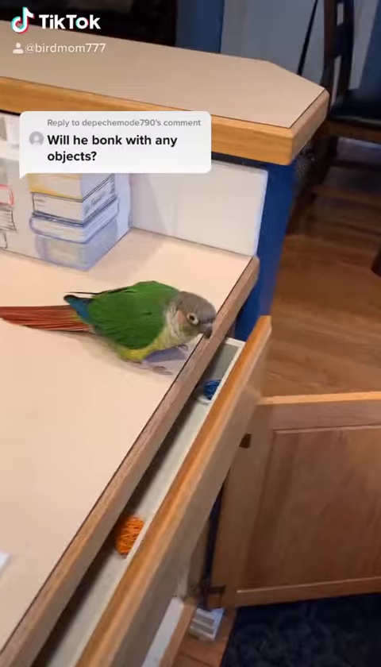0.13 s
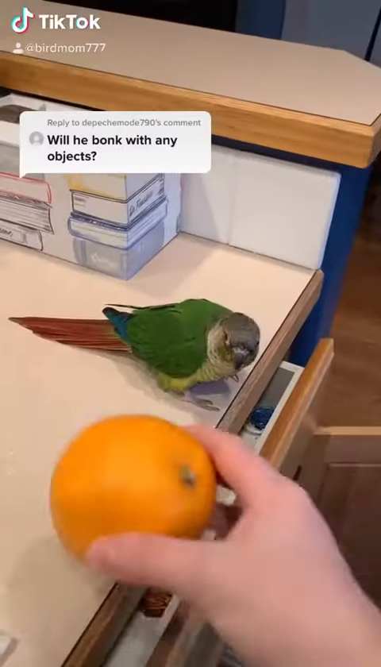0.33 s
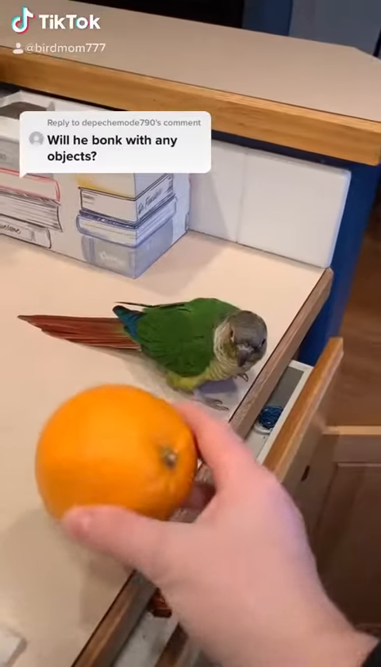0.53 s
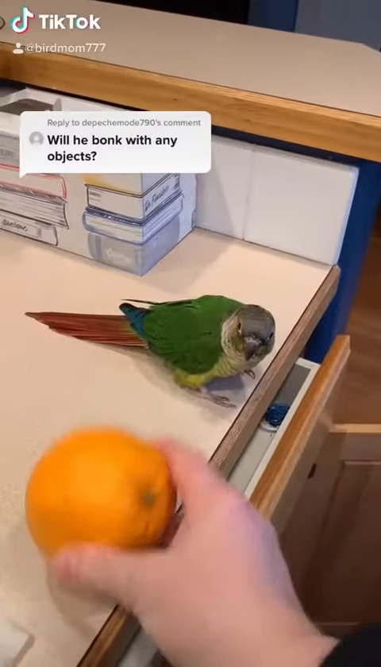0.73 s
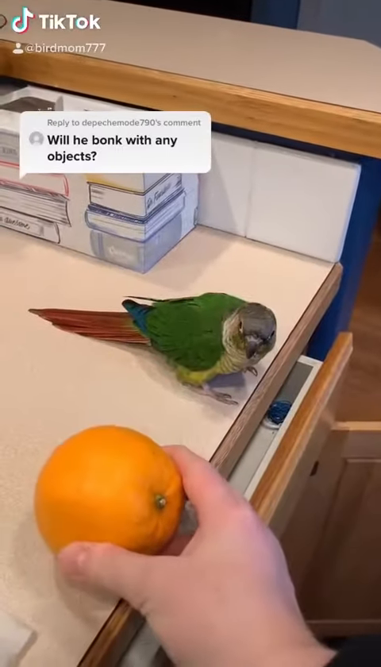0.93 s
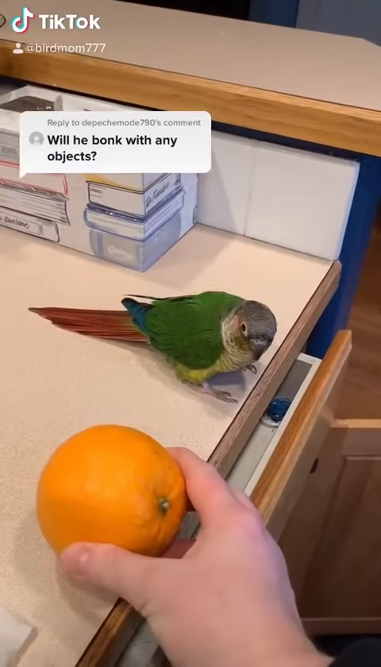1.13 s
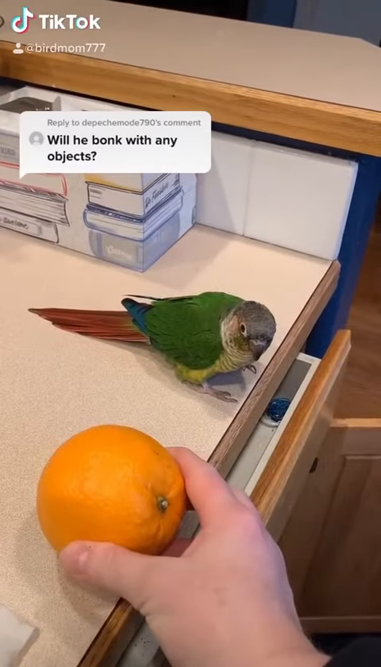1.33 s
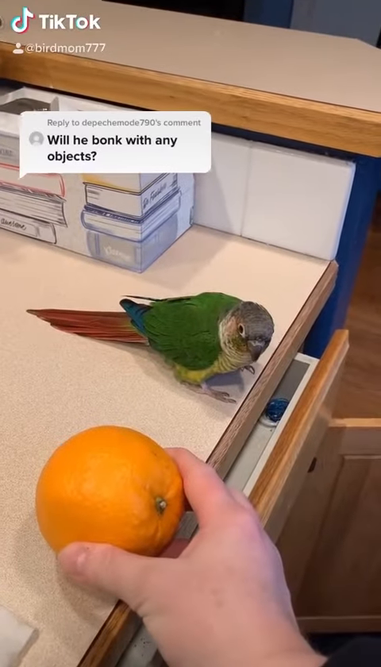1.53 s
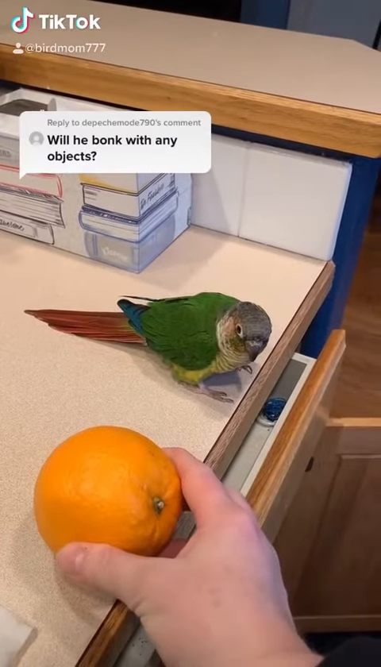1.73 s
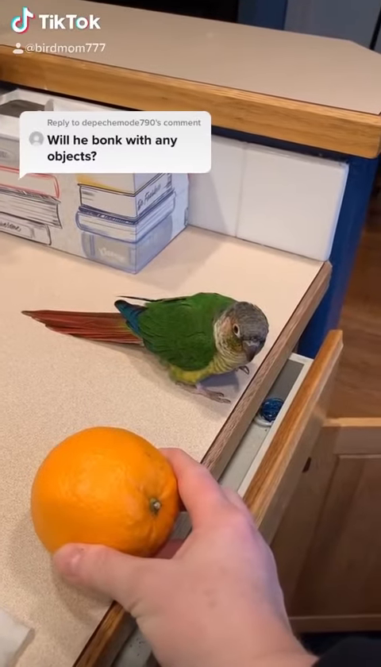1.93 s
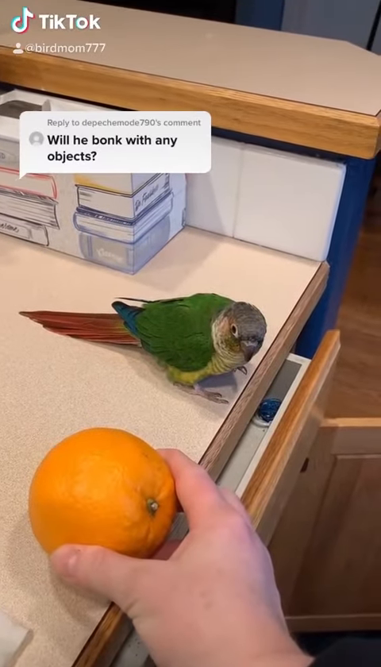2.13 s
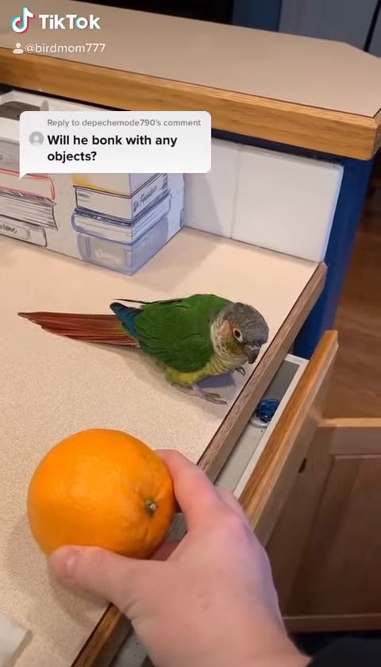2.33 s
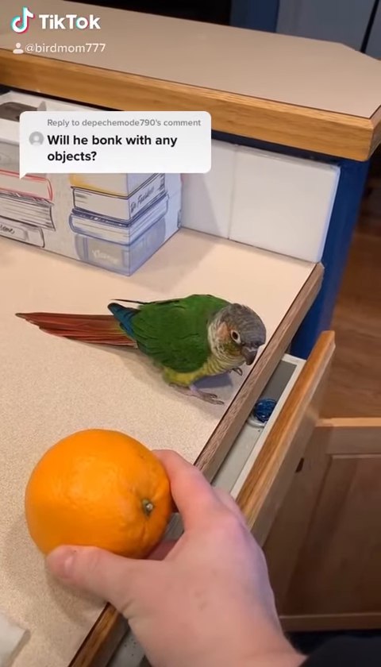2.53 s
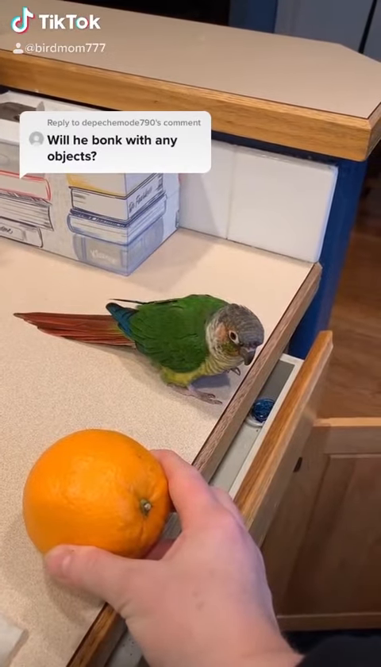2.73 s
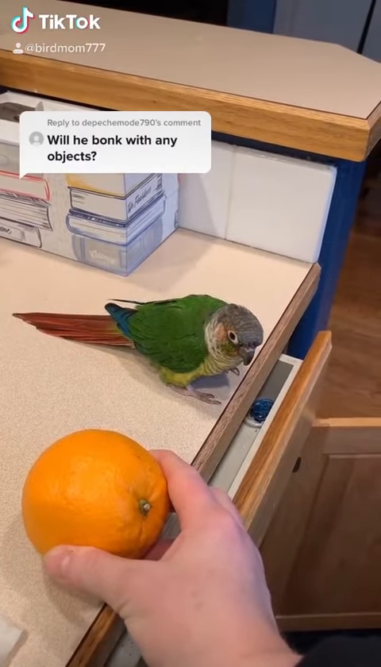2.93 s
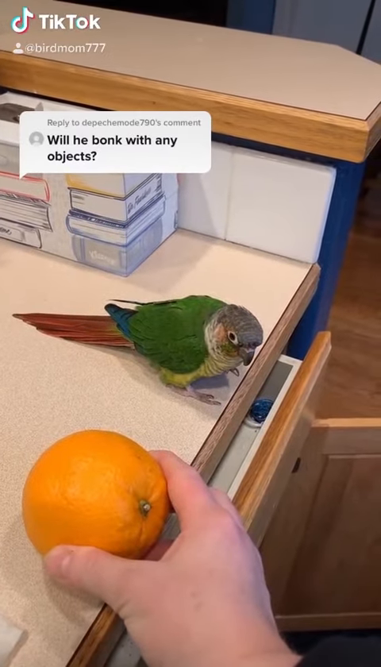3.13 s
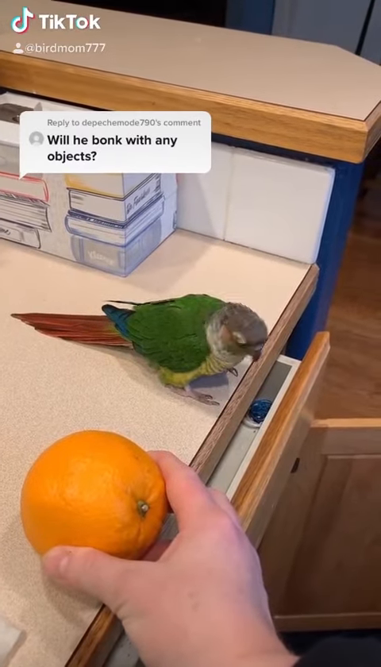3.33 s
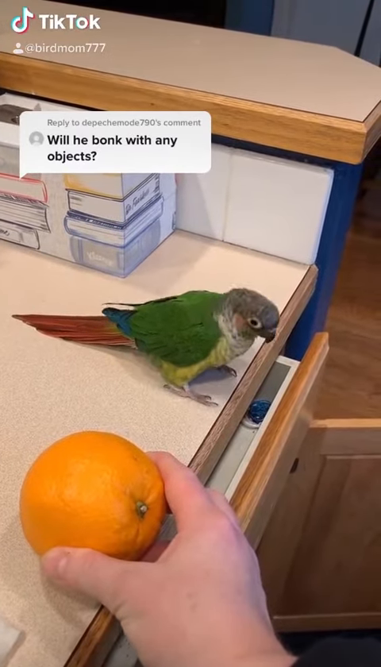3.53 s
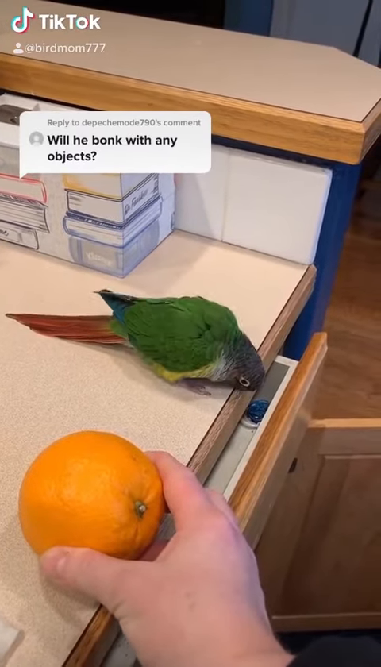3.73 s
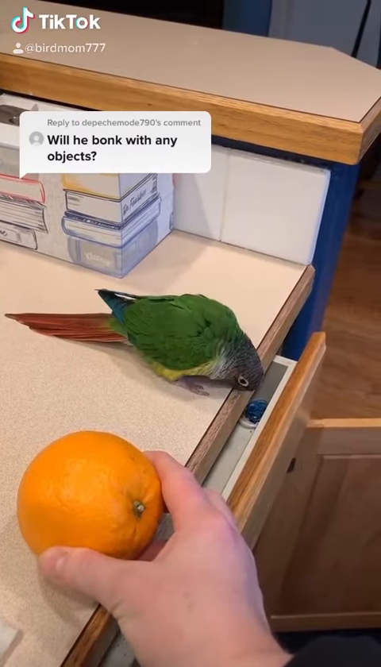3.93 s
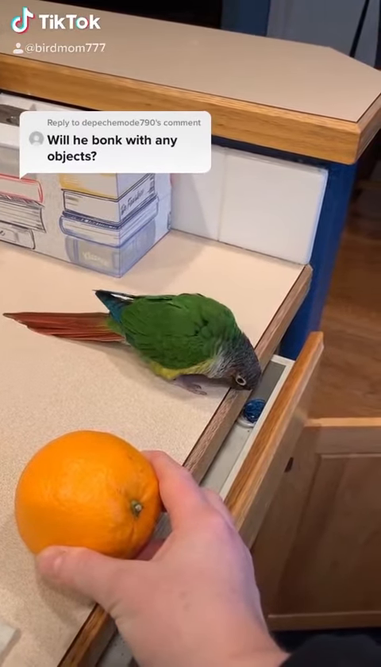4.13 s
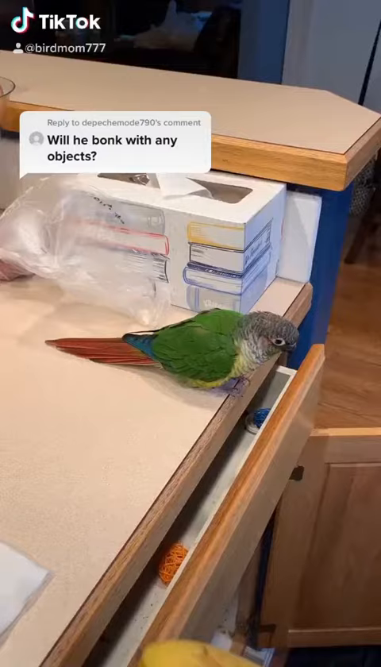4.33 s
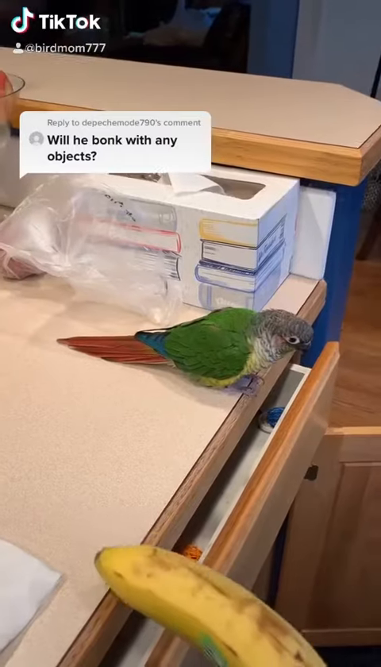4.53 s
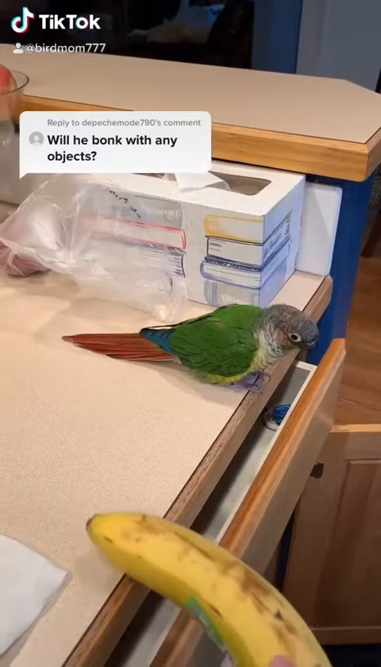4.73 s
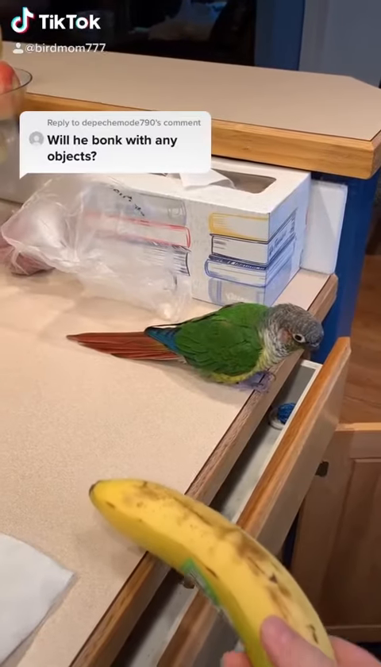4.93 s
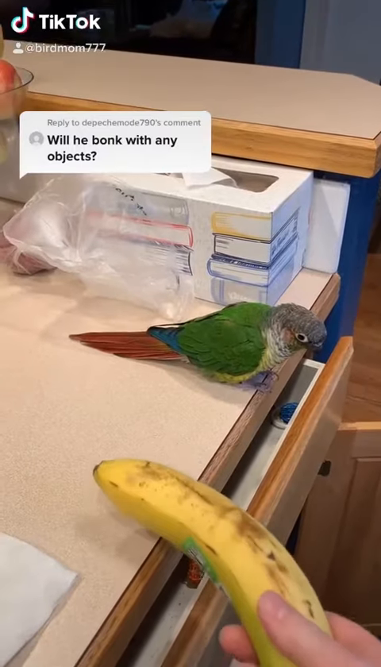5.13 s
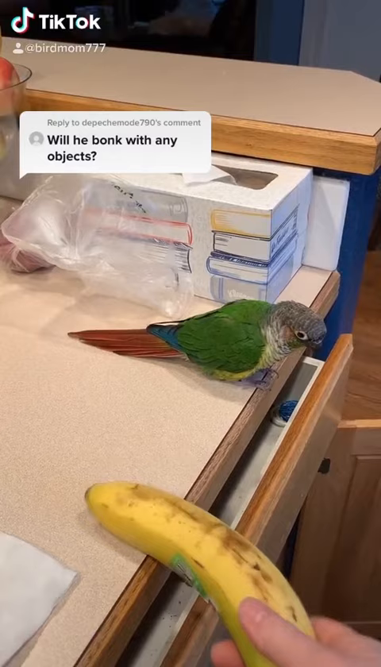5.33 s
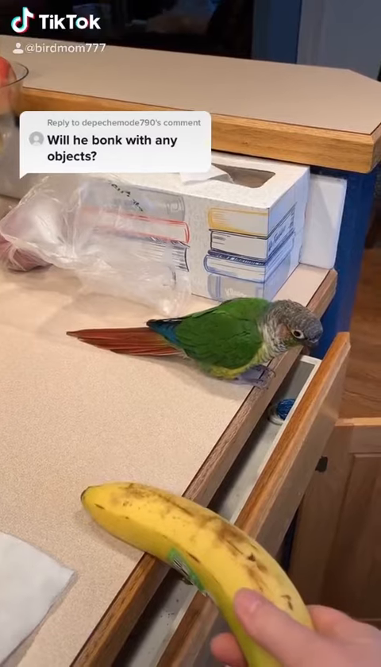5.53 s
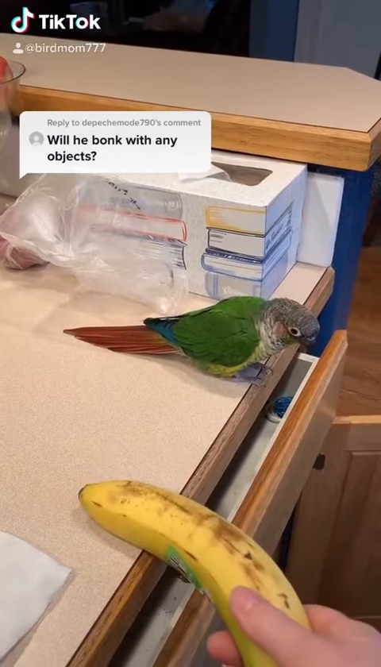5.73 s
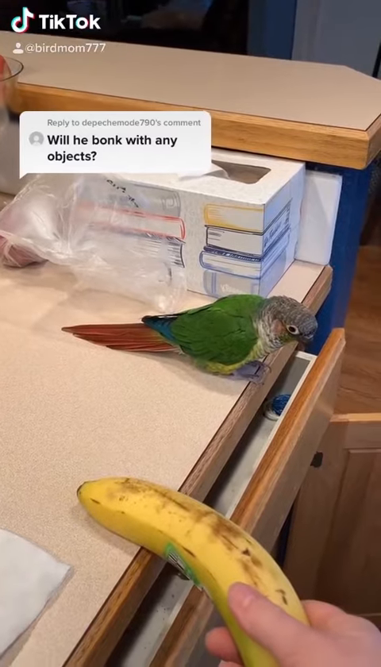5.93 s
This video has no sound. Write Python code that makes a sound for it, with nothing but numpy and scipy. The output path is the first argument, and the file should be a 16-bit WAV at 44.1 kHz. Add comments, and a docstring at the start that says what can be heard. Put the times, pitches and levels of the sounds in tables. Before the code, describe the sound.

Faint hand rubbing, then a heavy, dull orange thud on a hollow counter, with low shudder and brief rattling from a drawer. Soft nudges fade into quiet room hum. One hard, bright beak knock clacks on the wooden edge, followed by a tiny tick, muffled nudges and a grainy scuff. Finally a banana lands with a full, bassy double thump. Close stereo phone microphone, small lively kitchen.

```python
"""Fruit and beak knocks on a kitchen counter

A hand bumps an orange on laminate, a small parrot answers with its beak, a banana is bumped down and settles.
Blows are striker spectra through clicks, noise bursts, damped modes and room noise, with a deep shudder.
The fruit also shakes a drawer; filtered noise makes rattle, rustles and air, wavering sines the hum."""
import sys
import numpy as np
from scipy import signal
from scipy.fft import rfft, irfft
from scipy.io import wavfile
from scipy.ndimage import uniform_filter1d

SR = 44100
rng = np.random.default_rng(int(sys.argv[2]) if len(sys.argv) > 2 else 0)


def store_wav(level_fs):
    """Save 16-bit WAV to argv[1]."""
    pcm = np.round(np.clip(np.atleast_2d(level_fs), -1, 1) * 32767)
    wavfile.write(sys.argv[1], SR, pcm.T.astype(np.int16))


N = 267907

RING = 32768  # samples per event
FREQS = np.fft.rfftfreq(RING, 1 / SR)
AGE = np.arange(RING) / SR
SIDES = np.array([[1], [-1]]) / 2


def undb(db):
    """Decibels to gain."""
    return 10 ** (np.asarray(db) / 20)


def curve(points, hz):
    """Interpolate (Hz, value) points on a log-frequency axis."""
    point_hz, value = np.transpose(points)
    return np.interp(np.log(hz + 1e-3), np.log(point_hz), value)


def fade(age_s, t60_s):
    """Exponential decay, 60 dB down after t60."""
    return np.exp(-np.log(1000) * age_s / t60_s)


def level(x, rms_db):
    """Scale to an rms level."""
    return x * undb(rms_db) / np.sqrt(np.mean(x ** 2))


def unit(x):
    """Scale to unit energy in each channel."""
    return x / np.sqrt(np.sum(x ** 2, axis=-1, keepdims=True))


def add(out, sound, start_s):
    """Mix in a stereo event, easing out its last tenth."""
    i = max(int(start_s * SR), 0)
    eased = sound * np.minimum(10 * (1 - AGE / AGE[-1]), 1) ** 2
    out[:, i:i + RING] += eased[:, :N - i]


def diffuse(size, apart_hz, bass_alike=0.72):
    """Stereo noise spectrum: similar bass and unrelated treble at the two ports."""
    hz = np.fft.rfftfreq(size, 1 / SR)
    mid, side = rfft(rng.standard_normal((2, size)))
    alike = bass_alike / (1 + (hz / apart_hz) ** 4)
    shared = mid * np.sqrt(1 + alike)
    opposed = np.array([[1], [-1]]) * side * np.sqrt(1 - alike)
    return (shared + opposed) / np.sqrt(2)


def walk(rate_hz):
    """Smoothed random steps with a spread near 1."""
    k = int(SR / rate_hz)
    steps = np.repeat(rng.standard_normal(N // k + 1), k)
    smooth = uniform_filter1d(uniform_filter1d(steps, k), k)
    return level(smooth[:N], 0)


def above(corner_hz):
    """Second-order Butterworth high-pass response."""
    s = 1j * FREQS / corner_hz
    return s ** 2 / (s ** 2 + np.sqrt(2) * s + 1)


def octave_band(hz, octaves):
    """Gaussian band on an octave axis; octaves is its standard deviation."""
    return np.exp(-0.5 * (np.log2((FREQS + 1) / hz) / octaves) ** 2)


def late(lag_s):
    """Phase response of a pure delay."""
    return np.exp(-2j * np.pi * FREQS * lag_s)


def rustle(level_db, hz, octaves, rise_s, t60_s, grain_db=0):
    """Friction or shaking: a noise band, grainy if contact is uneven, that swells and dies."""
    grains = undb(grain_db * walk(rate_hz=280)[:RING])
    noise = irfft(diffuse(RING, apart_hz=705) * octave_band(hz, octaves)) * grains
    envelope = np.minimum(AGE / rise_s, 1) * fade(np.maximum(AGE - rise_s, 0), t60_s)
    return level(noise, level_db) * envelope  # level_db is rms before the envelope


# moving air and appliances, relative spectral density: freq_hz, density_db_per_hz
AIR_SPECTRUM = [(12, -20.5), (55, -0.5), (195, -7.5), (232, 1), (260, -5), (345, -5), (420, -14),
                (650, -20.5), (1250, -24.5), (1550, -28), (4100, -32.5), (4500, -30), (5000, -33.5),
                (8500, -37.5), (11000, -35)]
# appliance motor lines, before HUM_TRIM_DB: freq_hz, untrimmed_level_db
HUM_LINES = [(231.5, -76.5), (495.3, -89), (1109, -94.5), (1227, -100), (1346, -91), (4468, -99.5)]
AIR_LEVEL_DB, AIR_SWELL_DB, RUMBLE_FLUTTER_DB = -66.5, 0.6, 3.0
HUM_TRIM_DB, HUM_WAVER_DB, HUM_DRIFT_HZ = 1.0, 2, 0.62


def room_tone():
    """Soft moving air with a fluttering rumble, and the wavering lines of an appliance motor."""
    freqs = np.fft.rfftfreq(N, 1 / SR)
    spectrum = diffuse(N, apart_hz=456) * undb(curve(AIR_SPECTRUM, freqs))
    low = 1 / (1 + (freqs / 520) ** 4)
    deep = 1 / (1 + (freqs / 250) ** 4)
    air = irfft(spectrum * (1 - low), N)
    for part in (deep, 1 - deep):  # the two rumble bands flutter independently
        air = air + irfft(spectrum * low * part, N) * undb(RUMBLE_FLUTTER_DB * walk(rate_hz=18))
    air = level(air, AIR_LEVEL_DB) * undb(AIR_SWELL_DB * walk(rate_hz=5.6))
    hum = 0
    for hz, level_db in HUM_LINES:
        phase = 2 * np.pi * np.cumsum(hz + HUM_DRIFT_HZ * walk(rate_hz=9)) / SR
        port_lag_rad = np.array([[0], [min(hz / 700, 1.4)]])
        line = level(np.sin(phase - port_lag_rad), level_db + HUM_TRIM_DB)
        hum = hum + line * undb(HUM_WAVER_DB * walk(rate_hz=4.4))
    return air + hum


# the hand moves or shifts its grip on the fruit, rms before envelope: start_s, rub_db, hiss_db
HAND_MOVES_TABLE = [(0.17, -66, -80), (0.979, -65, -95), (4.221, -66, -84.5), (4.55, -80, -80.5),
                    (5.061, -77, -80.5)]
MOVE_RISE_S, MOVE_T60_S = 0.08, 1.72


def hand_moves(out):
    """Friction of the hand: a dull rub and a faint wide hiss of skin and sleeve swell and die together."""
    for start_s, rub_db, hiss_db in HAND_MOVES_TABLE:
        rub = rustle(rub_db, 253, 0.45, MOVE_RISE_S, MOVE_T60_S)
        hiss = rustle(hiss_db, 1877, 2.4, MOVE_RISE_S, MOVE_T60_S)
        add(out, rub + hiss, start_s)


# light scuffs on the counter, body rms before envelope, grit and bump relative to body:
# start_s, body_db, rise_s, body_width_octaves, grit_rel_db, bump_rel_db
SCUFFS_TABLE = [(0.255, -70.5, 0.14, 0.66, -21, 1), (4.375, -64, 0.0023, 0.85, -11, 0.077)]
SCUFF_T60_S, GRIT_T60_S, SCUFF_GRAIN_DB = 0.52, 0.43, 2.5


def scuffs(out):
    """Something catches on the laminate in small jerks: grainy woody body and grit, low bump below."""
    for start_s, body_db, rise_s, octaves, grit_db, bump_db in SCUFFS_TABLE:
        body = rustle(body_db, 854, octaves, rise_s, SCUFF_T60_S, SCUFF_GRAIN_DB)
        grit = rustle(body_db + grit_db, 3320, 0.2, rise_s, GRIT_T60_S, SCUFF_GRAIN_DB)
        bump = rustle(body_db + bump_db, 135, 0.5, rise_s, SCUFF_T60_S)
        add(out, body + grit + bump, start_s)


def strike_spot(depth_db=2, spacing_hz=110, from_hz=1500):
    """The struck spot favours some of the top's many high modes and misses others: random dB ripple."""
    favour = np.interp(FREQS / spacing_hz, np.arange(1024), rng.standard_normal(1024))
    return np.minimum(FREQS / from_hz, 1) ** 2 * depth_db * favour


def force(striker):
    """Minimum-phase (causal) pulse with the striker's spectrum, coloured by where it lands."""
    cepstrum = irfft(np.log(undb(curve(striker, FREQS) + strike_spot())))
    cepstrum[1:RING // 2] *= 2
    cepstrum[RING // 2 + 1:] = 0
    return np.exp(rfft(cepstrum))


def burst(length_s):
    """Spectrum of a short unit-energy noise rattle."""
    noise = irfft(diffuse(RING, apart_hz=1500))
    return rfft(unit(noise * np.sqrt(AGE) * np.exp(-AGE / length_s)))


def crack():
    """The laminate cracks again as the full weight follows the first touch: a delayed noise burst."""
    return burst(length_s=0.00034) * octave_band(2000, 1.0) * late(0.0026)


def modes(table, swell_cycles):
    """Damped modes that build over about a cycle; neighbours swing in opposite senses."""
    ring = 0
    for k, (hz, gain_db, t60_s) in enumerate(table):
        amplitude = undb(gain_db) * 2 * np.log(1000) / (t60_s * SR)  # spectral peak to waveform
        swell = 1 - np.exp(-AGE * hz / swell_cycles)
        wave = swell * fade(AGE, t60_s) * np.cos(2 * np.pi * hz * AGE)
        ring = ring + (-1) ** k * amplitude * wave
    return rfft(ring)


# wooden strip along the counter's edge, gain before swell: freq_hz, peak_gain_db, t60_s
EDGE_MODES = [(419.4, 20.5, 0.14), (665, 22, 0.044), (1215, 21.5, .05), (2360, 8.5, 0.04), (2800, 15, 0.03)]


def edge_strip():
    """The wooden edge clacks once the full weight has followed the first touch: delayed modes."""
    return modes(EDGE_MODES, swell_cycles=1.0) * late(0.002102)


# counter top and cabinet, gain before swell and bass cut: freq_hz, peak_gain_db, t60_s
COUNTER_MODES = [(85, 31.5, .28), (106.3, 29, 0.32), (117, 22, 0.13), (129.7, 41.5, 0.125), (149, 25, 0.11),
                 (156, 23.5, 0.13), (187, 27.5, 0.085), (228.3, 21, 0.33), (262.8, 19.5, 0.15),
                 (291.4, 21.5, 0.19), (342.6, 18, 0.18), (421, 15.5, 0.15), (526, 10, 0.26), (591, 9, 0.1),
                 (672, 8.5, 0.1), (771, 4, 0.11), (901, 13.5, 0.17), (1090, 1, 0.08), (1427, 7.5, 0.12),
                 (1594, 6.5, 0.17), (1697, 6.5, 0.17), (2220, 4, 0.043), (2660, 4, 0.13), (2880, 5, 0.1),
                 (3540, 4.5, 0.11), (4057, 3.5, 0.044), (4565, 5.5, .09)]


def counter(lag_s=0.011, spread=0.53, lowest_hz=62):
    """Top and cabinet: low bending waves travel slowest, and the deepest bass is not radiated."""
    delay_s = lag_s * (lowest_hz / np.maximum(FREQS, lowest_hz)) ** spread
    dispersion = np.exp(-2j * np.pi * np.cumsum(delay_s) * FREQS[1])  # phase integrates group delay
    return modes(COUNTER_MODES, swell_cycles=0.63) * above(lowest_hz) ** 2 * dispersion


# reverberation: freq_hz, t60_s
KITCHEN_DECAY = [(150, 0.52), (400, 0.43), (1000, 0.4), (3000, 0.38), (7000, 0.33), (12000, 0.04)]
# room colour, with a standing wave in the low mids: freq_hz, gain_db
KITCHEN_TINT = [(85, 2), (130, -3), (185, -2), (235, 4), (300, -1.5), (400, -0.5), (480, 1), (650, 0.5),
                (950, 1.5), (2100, 0), (3000, -1.5), (5200, 2), (7000, -3.5), (10500, -1)]
FIRST_WALL_S = 0.0051


def kitchen(early_db=-2, early_t60_s=0.13, patchy_db=4):
    """Quick, uneven reflections off tiles and cupboards, then a tail that dulls as it dies."""
    noise, tail = diffuse(RING, apart_hz=402), 0
    early_fade = fade(AGE, early_t60_s)
    patchy = unit(undb(patchy_db * walk(rate_hz=1100)[:RING]) * early_fade)
    early = patchy * np.sqrt(np.sum(early_fade ** 2))
    for hz, t60_s in KITCHEN_DECAY:
        band = curve([(f, f == hz) for f, _ in KITCHEN_DECAY], FREQS)
        tail = tail + irfft(noise * band) * (fade(AGE, t60_s) + undb(early_db) * early)
    onset = 1 - np.exp(-(AGE / FIRST_WALL_S) ** 2)
    return rfft(unit(tail * onset)) * above(239.0) * undb(curve(KITCHEN_TINT, FREQS))


# left minus right of the panels: freq_hz, balance_db
PANEL_TILT = [(130, -1.5), (280, -2), (600, -2.5), (1200, 6), (2300, 5), (4000, 0)]


def knock(striker, boom_db, edge_db, click_db, chatter_db, crack_db, room_db, pan_db, lead_ms):
    """One blow: force drives click, chatter, laminate crack, edge clack, cabinet boom and room."""
    right_late = late(np.array([[0], [1]]) * abs(lead_ms) / 1000)
    boom, clack = undb(boom_db) * counter(), undb(edge_db) * edge_strip()
    click = undb(click_db) * above(900)
    chatter = undb(chatter_db) * burst(length_s=0.0031) * above(1090)
    panels = (boom + clack) * undb(curve(PANEL_TILT, FREQS) * SIDES)
    direct = right_late * (click + panels) + chatter + undb(crack_db) * crack()
    # the panels are right under the phone, so less of their sound arrives by way of the walls
    to_room = above(250) + undb(-5.0) * boom + undb(-12) * clack
    room = undb(room_db) * kitchen() * to_room
    return irfft(force(striker) * (direct + room)) * undb(pan_db * SIDES)


# striker force; soft fruit pushes long and low, hard horn is short and bright: freq_hz, force_db
ORANGE_FORCE = [(85, 11.5), (130, -.5), (180, -7), (310, 0.5), (420, -1.5), (630, -2.5), (830, -22),
                (1100, -23.5), (1400, -23), (2100, -12), (3300, -28.5), (4200, -25.5), (5300, -33),
                (6500, -33.5), (8500, -41), (11500, -28.5)]
BEAK_FORCE = [(80, -11), (130, -5.5), (200, -4), (300, -6.5), (410, -3), (500, -3), (700, 0), (1200, -2),
              (1550, -2.5), (2000, -0.5), (2800, -3), (4300, -1.5), (5200, -11), (7000, -5), (8500, -19),
              (10500, -3), (12500, -8)]
BANANA_FORCE = [(80, 2), (130, -0.5), (200, 2), (280, 0.5), (420, -3), (550, -10), (850, -15),
                (1150, -19.5), (1450, -17), (2000, -27.5), (2600, -30.5), (3700, -40), (4550, -30.5),
                (5100, -42.5), (6200, -38.5), (8500, -43), (10300, -26.5), (12500, -36)]
# blows of orange, beak, banana and the banana's soft second landing; layer levels are relative to gain_db,
# shudder is rms before envelope and independent of gain_db: start_s, gain_db, boom_db, edge_db, click_db,
# chatter_db, crack_db, room_db, shudder_db, left_minus_right_db, left_lead_ms
BLOWS = [(0.811, 5, -2.5, -18.5, 3.5, -0.5, -9, -3, -44, -1.2, 0.032),
         (3.7297, 1, 0.84, 2.5, -5.5, -1, 0, -1, -53.5, 0.0, 0.16),
         (5.4220, 9, 0.1, -10, -1, -3.5, -2, -2.5, -47.5, -0.5, 0.026),
         (5.4703, -7.5, 1.5, -10, -3, -2, -4, -4, -53, -1, 0.032)]


def knocks(out):
    """Each blow drives the counter; a deep noise band is the cabinet's shudder."""
    strikers = (ORANGE_FORCE, BEAK_FORCE, BANANA_FORCE, BANANA_FORCE)
    for striker, (start_s, gain_db, *layers_db, shudder_db, pan_db, lead_ms) in zip(strikers, BLOWS):
        add(out, undb(gain_db) * knock(striker, *layers_db, pan_db, lead_ms), start_s)
        add(out, rustle(shudder_db, hz=46, octaves=1, rise_s=0.015, t60_s=0.37), start_s)


# the heavy fruit shakes the open drawer, rms before envelope: start_s, wood_db, contents_db
DRAWER_SHAKES = [(0.816, -60, -60.5), (5.427, -66.5, -68.5)]
# the drawer's wood, then its contents: freq_hz, width_octaves, rise_s, t60_s
DRAWER_PARTS = [(940, 0.3, 0.027, 0.5), (2800, 0.34, 0.012, 0.25)]


def rattles(out):
    """The boom shakes loose things, likely the open drawer and what lies in it: grainy noise bands."""
    for start_s, *levels_db in DRAWER_SHAKES:
        for level_db, part in zip(levels_db, DRAWER_PARTS):
            add(out, rustle(level_db, *part, grain_db=3.5), start_s)


# soft, dull nudges against the counter, rms before envelope: start_s, level_db, freq_hz
NUDGES_TABLE = [(1.078, -65, 300), (1.165, -63.5, 234), (4.312, -61.5, 307), (4.441, -64.5, 180)]


def nudges(out):
    """Soft contact excites only a narrow low band of noise."""
    for start_s, level_db, hz in NUDGES_TABLE:
        add(out, rustle(level_db, hz, octaves=0.35, rise_s=0.014, t60_s=0.3), start_s)


def tick(out):
    """One tiny tick, likely a claw: a very short, bright noise band."""
    add(out, rustle(-69, hz=2700, octaves=0.25, rise_s=0.002, t60_s=0.03), start_s=4.245)


def scene():
    """Orange, beak and banana in turn, small movements between them, over the quiet kitchen."""
    out = room_tone()
    for source in (hand_moves, scuffs, knocks, rattles, nudges, tick):
        source(out)
    return out


START_S, TOP_HZ = 0.095, 12150


def record(dry):
    """Silence until START_S, where the sound cuts in abruptly; an elliptic low-pass removes the top."""
    opened = dry * (np.arange(N) / SR > START_S)
    low_pass = signal.ellip(8, 0.2, 70, TOP_HZ, fs=SR, output="sos")  # ripple 0.2 dB, stop 70 dB
    return signal.sosfilt(low_pass, opened)


dry = scene()
out = record(dry)
store_wav(out)
```